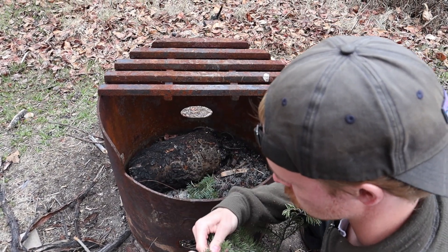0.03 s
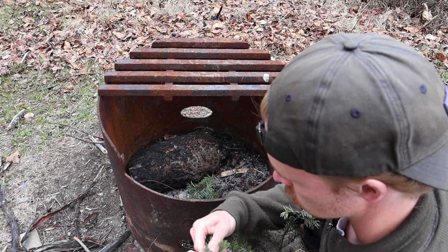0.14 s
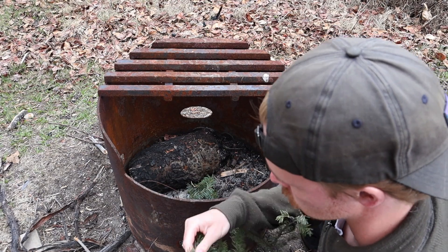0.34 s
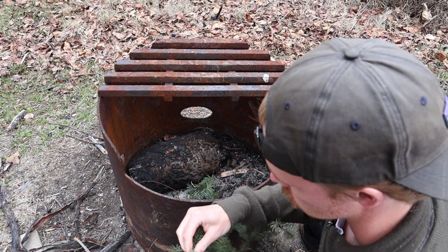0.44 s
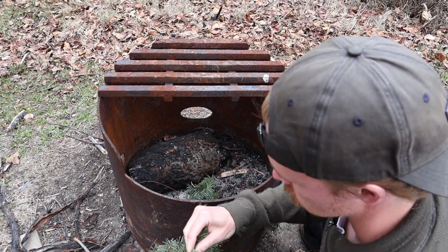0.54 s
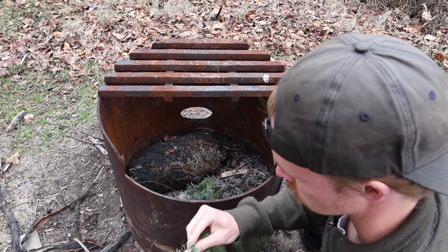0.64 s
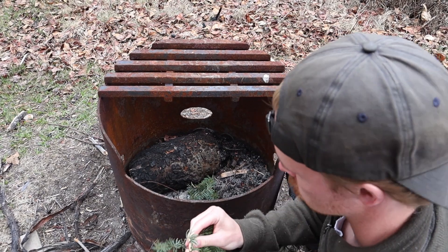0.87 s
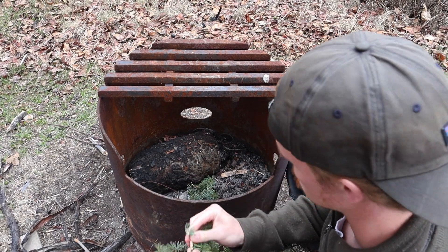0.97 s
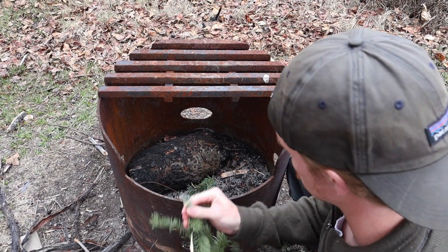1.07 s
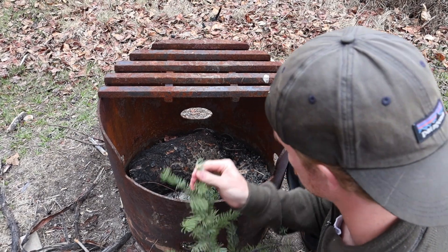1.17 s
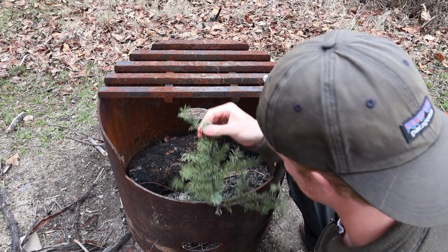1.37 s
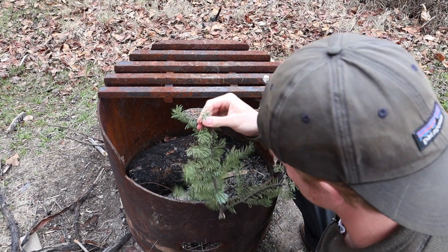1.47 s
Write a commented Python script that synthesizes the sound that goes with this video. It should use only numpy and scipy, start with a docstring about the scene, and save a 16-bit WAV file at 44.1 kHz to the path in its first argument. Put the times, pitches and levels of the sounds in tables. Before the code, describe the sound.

A small conifer twig is snapped by hand with two sharp cracks almost together, then fine dry ticks, a needle sprig scraping free and light stick taps; close microphone, quiet outdoor air behind.

```python
"""Outdoors, close to the microphone: a small conifer twig is snapped by hand, two sharp cracks in quick succession.
Each break is a set of dying wood modes plus a spray of fibre clicks; dry fibres tick as short high rings with grit.
A sprig of needles is pulled out and scrapes free, made of dense tiny slips; sticks tap, with a faint squeak
and soft low bumps. Decaying click bursts form the ground echo, scatter and woods tail.
Shaped, wavering noise is the outdoor hush and low rumble of air behind it all."""
import sys
import numpy as np
from scipy import signal
from scipy.io import wavfile

SR = 44100
rng = np.random.default_rng(int(sys.argv[2]) if len(sys.argv) > 2 else 0)


def pcm_store(signal):
    """Save signal as 16-bit PCM."""
    levels = np.round(np.clip(np.atleast_2d(signal), -1, 1) * 32767)
    wavfile.write(sys.argv[1], SR, levels.astype(np.int16).T)


N = 68355  # length in samples

# Colour of the outdoor air: pitch_hz, level_db (relative, per Hz)
HUSH_COLOUR = [(15, 5), (35, 3), (80, 3.5), (130, 0), (250, -4.5), (500, -3.5), (1000, -4.5), (1600, -10),
               (3300, -14), (6500, -24), (10000, -22), (16000, -25.5)]
HUSH_DB, HUSH_WAVER_DB = -50, 1.24  # middle level, rms swing around it

# Colour of what the surroundings return: pitch_hz, level_db (relative)
ECHO_COLOUR = [(100, 2), (1000, -4.5), (3500, -0.5), (6000, 1.5), (10000, -2), (16000, -3.5)]
GROUND_S, GROUND_DB, GROUND_T60_S = 0.0042, -20, 0.0052
SCATTER_DB, SCATTER_T60_S = -16, 0.026
WOODS_DB, WOODS_T60_S = -33, 0.17

# Soft low bumps of movement: start_s, level_db, pitch_hz
BUMPS = [(0.023, -43.5, 114), (0.732, -37, 77), (0.796, -47, 84), (.945, -46.5, 60), (1.188, -46, 68)]
BUMP_LENGTH_S = 0.04

# One faint rising chirp
SQUEAK_S, SQUEAK_LENGTH_S, SQUEAK_DB = 0.829, 0.028, -46.5
SQUEAK_FROM_HZ, SQUEAK_TO_HZ = 3000, 5600

# Level curve of the stem rubbing along other sticks: time_s, level_db
RUBBING = [(.69, -70), (.74, -50), (.80, -58), (.90, -71), (1.20, -57.5), (1.245, -50), (1.264, -45),
           (1.276, -52.5), (1.283, -39), (1.2885, -32), (1.295, -37), (1.299, -55), (1.315, -80)]
# Colour of the rubbing stem: pitch_hz, level_db (relative)
STEM_COLOUR = [(200, -34), (1200, -29.5), (1700, -7), (2900, -4.5), (3600, 2.5), (4200, -11), (5600, -15.5),
               (7500, -18.5), (10000, -25.5), (16000, -35)]
STEM_SLIPS_PER_S, STEM_SPREAD_DB = 7900, 3.5

# Level curve of needles brushing past each other: time_s, level_db
BRUSHING = [(0, -62), (.37, -63), (.40, -53), (.46, -64), (.70, -64), (.73, -52.5), (.80, -54.5),
            (.90, -58.5), (1.0, -61.5), (1.04, -48.5), (1.08, -40.5), (1.165, -41), (1.19, -50.5),
            (1.28, -61.5), (1.31, -63), (1.55, -66)]
# Colour of the needles: pitch_hz, level_db (relative)
NEEDLE_COLOUR = [(100, -14.5), (400, 1.5), (1400, -2), (2200, -1), (3800, 0.5), (6500, -3.5), (9000, 3),
                 (11000, 3.5), (13500, -2.5), (16000, -7.5)]
NEEDLE_SLIPS_PER_S, NEEDLE_SPREAD_DB = 4000, 3

# Sticks that tap each other: start_s, level_db, pitch_hz
TAPS = [(0.3456, -36.5, 1780), (.3478, -44, 750), (.3505, -39.5, 427), (1.4990, -32, 3290),
        (1.5024, -36.5, 3290), (1.5463, -45, 3940)]
# Modes of a tapped stick: pitch_ratio, level_db (relative to the tap), t60_s
STICK_MODES = [(.85, -7.5, 0.018), (1.02, -4, 0.015), (1.33, -0.5, 0.0077)]
TAP_GRIT_DB, TAP_GRIT_T60_S = -6.5, 0.0057  # grit level is relative to the tap

# Ticks of dry fibres and needles: start_s, level_db, pitch_hz, grit_db (relative to the ring)
TICKS = [(0.045, -32, 11500, -7), (0.1334, -28.5, 10600, -10), (.1563, -33, 10000, -5),
         (.4047, -27, 7500, -11), (.4211, -45, 10000, -11), (.5631, -18.5, 9700, -16),
         (0.571, -31, 10600, -9), (.5843, -38, 11000, -10), (.5890, -35, 10500, -10),
         (0.619, -31.5, 13500, -3), (0.6798, -32, 9500, -10), (0.6816, -35, 10000, -13),
         (.7181, -35, 10500, -11), (.7331, -35, 10100, -2), (0.7498, -35, 5630, -5),
         (.7501, -39, 10000, -3), (0.7597, -42, 5600, -3), (0.796, -32, 11000, -10),
         (0.8222, -25, 8500, -13), (0.8648, -23.5, 10100, -8), (1.0163, -36, 10000, -11),
         (1.0275, -27.5, 10400, -7), (1.0616, -35, 10500, -11), (1.1141, -18, 9900, -12),
         (1.1173, -17.5, 10400, -11), (1.1361, -27, 10000, -9), (1.1696, -25.5, 9500, -6),
         (1.4036, -34, 11000, -10), (1.4411, -37.5, 11000, -7), (1.5334, -34.5, 11100, -20)]
TICK_RING_T60_S, TICK_GRIT_T60_S = 0.0015, 0.0058
# Colour of the grit in ticks and taps: pitch_hz, level_db (relative)
GRIT_COLOUR = [(200, -2), (1500, -7), (3500, 1.5), (6000, 1), (10000, 2.5), (16000, 1)]

# Fractures of the twig: start_s, level_db, body_db (weight of low modes and fibres), low_cut_hz (lowest pitch)
FRACTURES = [(.1973, -2.5, 1.5, 494), (.2160, -23, 1, 900), (0.2218, -35, 2, 1200), (0.2252, -22, -5, 1200),
             (0.2257, -8.5, -2, 1190), (0.2282, -4, -0.5, 1320)]
# Modes of the breaking twig: pitch_hz, level_db (relative to the fracture), t60_s
TWIG_MODES = [(740, -20.5, 0.0054), (1060, -22, 0.013), (2183, -20, 0.014), (2680, -16, 0.0051),
              (3790, -14.5, 0.0042), (5680, -21, 0.0063), (6600, -25.5, 0.0064), (8900, -23, 0.0055),
              (10200, 1, 0.0026), (11900, -15, 0.0036), (13330, -8, .003), (15500, -28, .003)]
BODY_BELOW_HZ = 7000
# Colour of the torn fibres: pitch_hz, level_db (relative)
SPLINTER_COLOUR = [(100, -30), (500, -28), (1100, 1.5), (3500, 18), (7500, 13), (10000, -14), (13000, -8),
                   (16000, -18.5)]
SPLINTER_DB, SPLINTER_T60_S = -21, 0.008  # level before the body weight

# Tone over the whole sound, with a dip and peak near 5 kHz: pitch_hz, level_db (relative)
OVERALL_COLOUR = [(20, -2.5), (4100, 0.5), (4700, -3.5), (5100, 1.5), (5500, 7), (6200, 0),
                  (16000, -0.5)]
SELF_NOISE_DB, EDGE_HZ = -90.5, 16300  # hiss before the band limit, upper band edge


def amp(db):
    """Turns decibels into gain."""
    return 10 ** (np.asarray(db) / 20)


def evened(x):
    """Scales a sound to an rms of one."""
    return x / np.sqrt(np.mean(x ** 2) + 1e-20)


def seconds(length):
    """Makes a time axis of the given length in seconds."""
    return np.arange(int(length * SR)) / SR


def fade(t, t60):
    """Exponential decay that falls 60 dB in t60 seconds."""
    return amp(-60 * t / t60)


def add(mix, start_s, sound):
    """Mixes a sound in at its start time, cut off at the end of the mix."""
    part = mix[max(round(start_s * SR), 0):][:len(sound)]
    part += sound[:len(part)]


def colour(x, points, size=4096):
    """Minimum-phase filter of unit energy, drawn through pitch_hz, level_db points."""
    hz, db = np.transpose(points)
    bins_hz = abs(np.fft.fftfreq(size, 1 / SR))
    curve_db = np.interp(np.log(bins_hz + 1), np.log(hz + 1), db)
    log_gain = np.log(amp(curve_db))
    # The Hilbert transform supplies the phase that makes the filter causal
    response = np.exp(np.conj(signal.hilbert(log_gain)))
    impulse = np.fft.ifft(response).real[:size // 2]
    return signal.fftconvolve(x, impulse / np.linalg.norm(impulse))[:len(x)]


def burst(t, t60):
    """A dying spray of tiny clicks of random sign, one per sample."""
    return rng.choice([-1., 1.], len(t)) * fade(t, t60)


def ring(t, hz, t60):
    """One struck mode: a sine that dies away."""
    return np.sin(2 * np.pi * hz * t) * fade(t, t60)


def hush():
    """Distant outdoor noise and low air: coloured noise, wavering slightly at 1 to 20 Hz."""
    t = np.arange(N) / SR
    waver = np.zeros(N)
    for hz in np.geomspace(1, 20, 20):
        waver += np.sin(2 * np.pi * (hz * t + rng.random())) / np.sqrt(hz)
    air = colour(rng.standard_normal(2 * N), HUSH_COLOUR)[N:]  # skips the filter's onset
    return amp(HUSH_DB + HUSH_WAVER_DB * evened(waver)) * evened(air)


def surroundings(x):
    """Adds a rough echo off the ground, scatter from things nearby, and a faint tail from the woods."""
    t, echo = seconds(0.3), np.zeros(SR // 2)
    returns = [
        (GROUND_S, GROUND_DB, GROUND_T60_S),
        (GROUND_S / 2, SCATTER_DB, SCATTER_T60_S),
        (2 * GROUND_S, WOODS_DB, WOODS_T60_S),
    ]
    for delay_s, level_db, t60_s in returns:
        tail = burst(t, t60_s)
        add(echo, delay_s, amp(level_db) * tail / np.linalg.norm(tail))
    return x + signal.fftconvolve(x, colour(echo, ECHO_COLOUR))[:N]


def bumps():
    """A few soft low cycles for each shift of weight."""
    out, t = np.zeros(N), seconds(BUMP_LENGTH_S)
    for start_s, level_db, pitch_hz in BUMPS:
        add(out, start_s, amp(level_db) * np.hanning(len(t)) * np.sin(2 * np.pi * pitch_hz * t))
    return out


def squeak():
    """A faint tone that slides upwards, swelling and fading."""
    out, t = np.zeros(N), seconds(SQUEAK_LENGTH_S)
    hz = np.linspace(SQUEAK_FROM_HZ, SQUEAK_TO_HZ, len(t))
    tone = np.sin(2 * np.pi * np.cumsum(hz) / SR)
    add(out, SQUEAK_S, amp(SQUEAK_DB) * np.sqrt(np.hanning(len(t))) * tone)
    return out


def friction(levels, points, slips_per_s, spread_db):
    """Dense tiny slips of uneven size and random sign, following a level curve."""
    size = amp(spread_db * np.minimum(rng.exponential(1, N), 4))
    happens = rng.random(N) < slips_per_s / SR
    slips = size * rng.choice([-1., 1.], N) * happens
    level_db = np.interp(np.arange(N) / SR, *np.transpose(levels))
    return colour(evened(slips) * amp(level_db), points)


def stem_rubbing():
    """The stem catches and slips along other sticks in a dense stream."""
    return friction(RUBBING, STEM_COLOUR, STEM_SLIPS_PER_S, STEM_SPREAD_DB)


def needles_brushing():
    """Needles slip past each other as the sprig scrapes free."""
    return friction(BRUSHING, NEEDLE_COLOUR, NEEDLE_SLIPS_PER_S, NEEDLE_SPREAD_DB)


def taps():
    """Sticks knock together: three short modes and a puff of grit."""
    out, t = np.zeros(N), seconds(0.04)
    for start_s, level_db, pitch_hz in TAPS:
        wood = sum(amp(mode_db) * ring(t, pitch_hz * ratio, t60_s) for ratio, mode_db, t60_s in STICK_MODES)
        grit = amp(TAP_GRIT_DB) * colour(burst(t, TAP_GRIT_T60_S), GRIT_COLOUR)
        add(out, start_s, amp(level_db) * (wood + grit))
    return out


def ticks():
    """Single fibres give way: a brief high ring and a little grit."""
    out, t = np.zeros(N), seconds(0.02)
    for start_s, level_db, pitch_hz, grit_db in TICKS:
        fibre = ring(t, pitch_hz, TICK_RING_T60_S)
        grit = amp(grit_db) * colour(burst(t, TICK_GRIT_T60_S), GRIT_COLOUR)
        add(out, start_s, amp(level_db) * (fibre + grit))
    return out


def snaps():
    """Each fracture rings the twig and tears a spray of fibres; shorter pieces have less bass."""
    out, t = np.zeros(N), seconds(0.04)
    for start_s, level_db, body_db, low_cut_hz in FRACTURES:
        wood = np.zeros(len(t))
        for k, (pitch_hz, mode_db, t60_s) in enumerate(TWIG_MODES):
            weight_db = body_db if pitch_hz < BODY_BELOW_HZ else 0
            # Neighbouring modes start in opposite directions
            wood += (-1) ** k * amp(mode_db + weight_db) * ring(t, pitch_hz, t60_s)
        fibres = amp(SPLINTER_DB + body_db) * colour(burst(t, SPLINTER_T60_S), SPLINTER_COLOUR)
        low_cut = signal.butter(2, low_cut_hz, "high", fs=SR)
        add(out, start_s, amp(level_db) * signal.lfilter(*low_cut, wood + fibres))
    return out


def scene():
    """The handling and its echoes over bumps and hush, the same in both ears."""
    handling = squeak() + stem_rubbing() + needles_brushing() + taps() + ticks() + snaps()
    mono = hush() + bumps() + surroundings(handling)
    return np.array([mono, mono])


def record(dry):
    """A dip and peak near 5 kHz over the whole sound, a faint microphone hiss per channel, then the band limit."""
    toned = np.array([colour(channel, OVERALL_COLOUR) for channel in dry])
    heard = toned + amp(SELF_NOISE_DB) * rng.standard_normal(dry.shape)
    band_limit = signal.firwin(301, EDGE_HZ, window=("kaiser", 8), fs=SR)
    return signal.oaconvolve(heard, band_limit[None], "same")


dry = scene()
out = record(dry)
pcm_store(out)
```